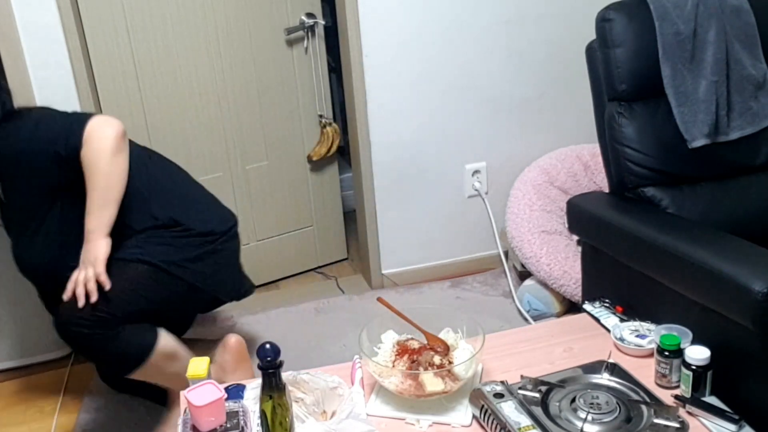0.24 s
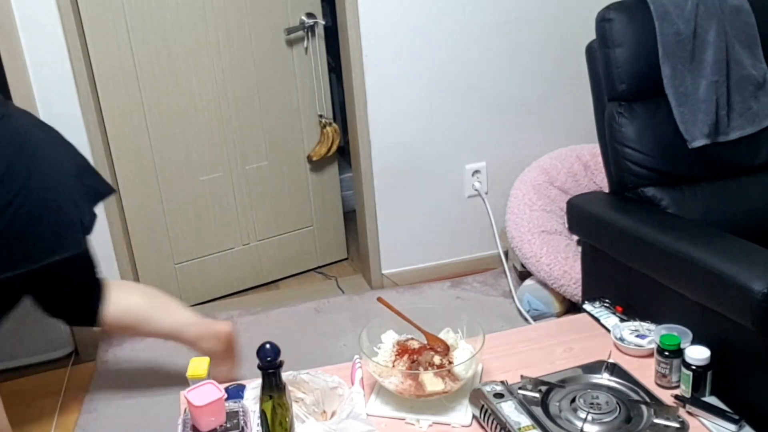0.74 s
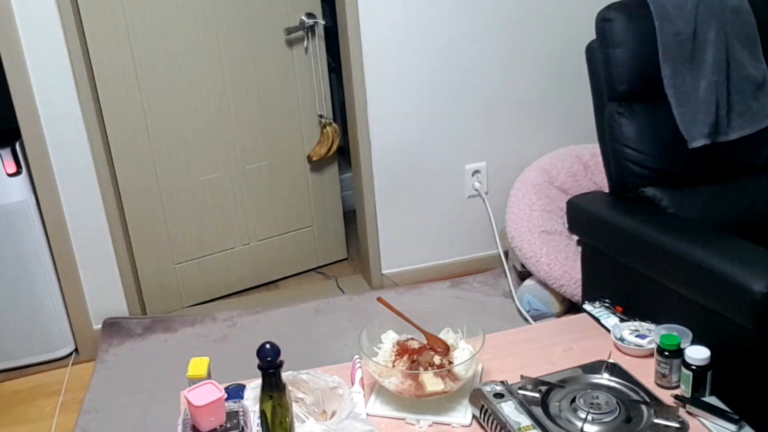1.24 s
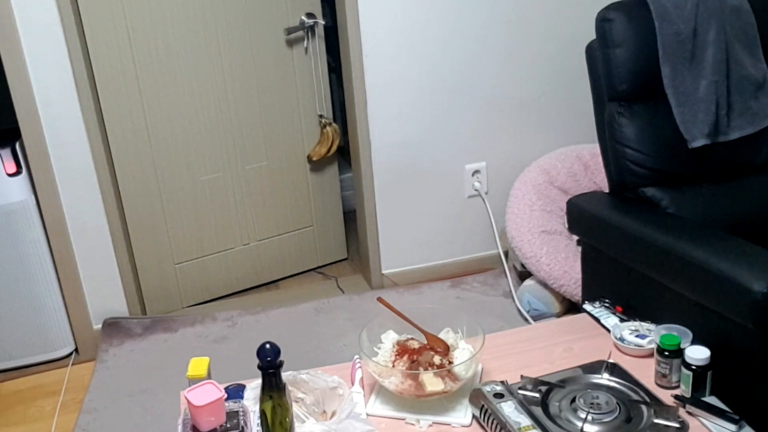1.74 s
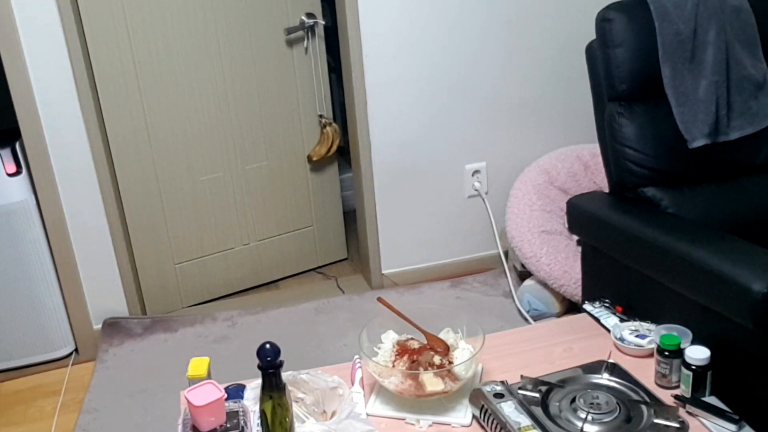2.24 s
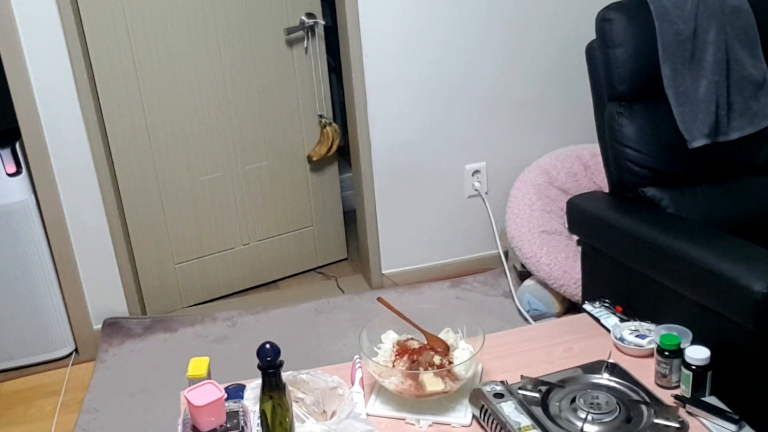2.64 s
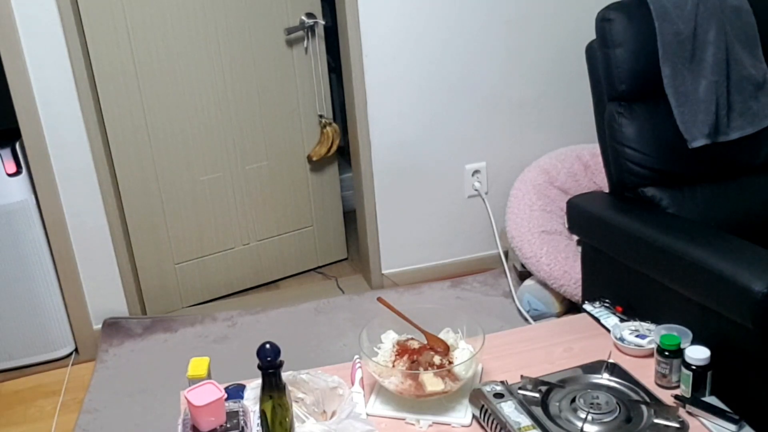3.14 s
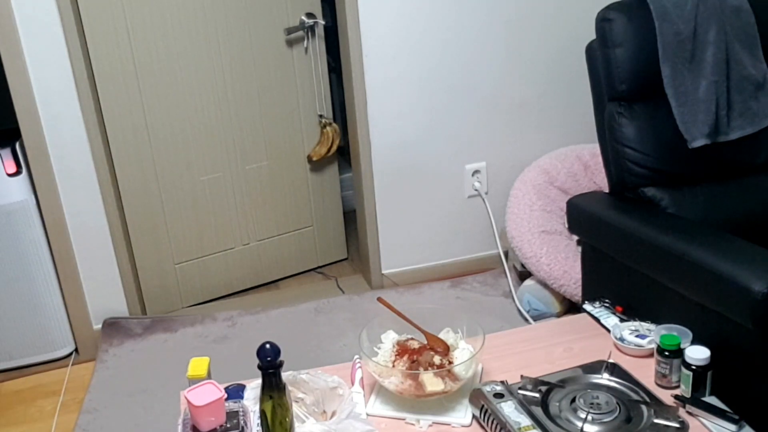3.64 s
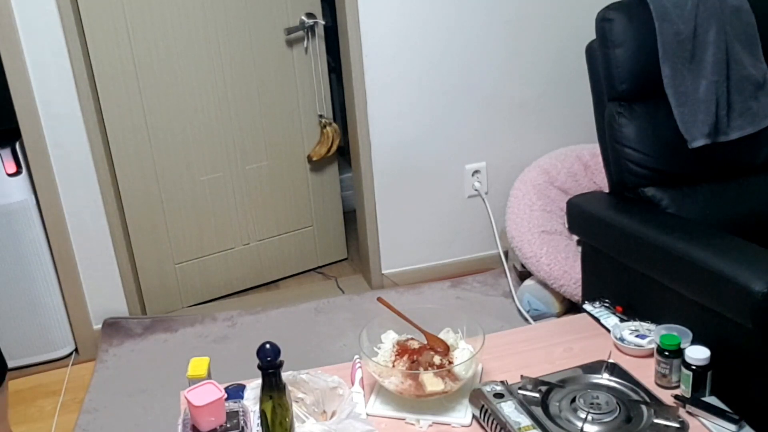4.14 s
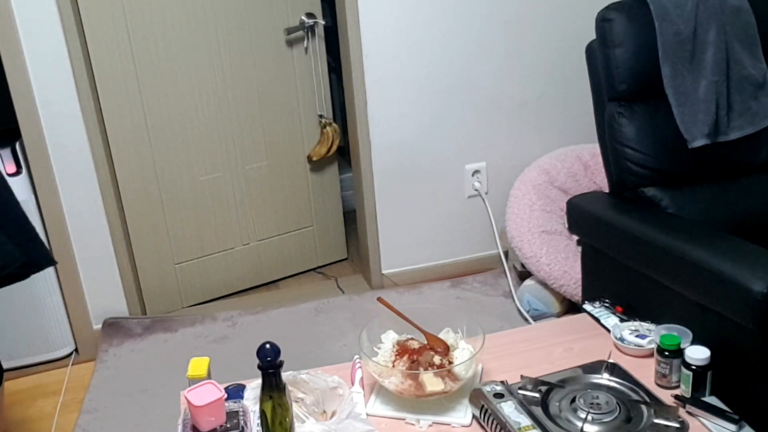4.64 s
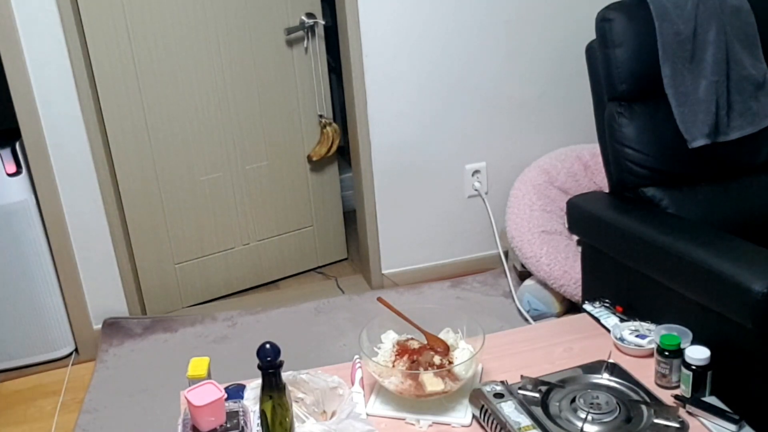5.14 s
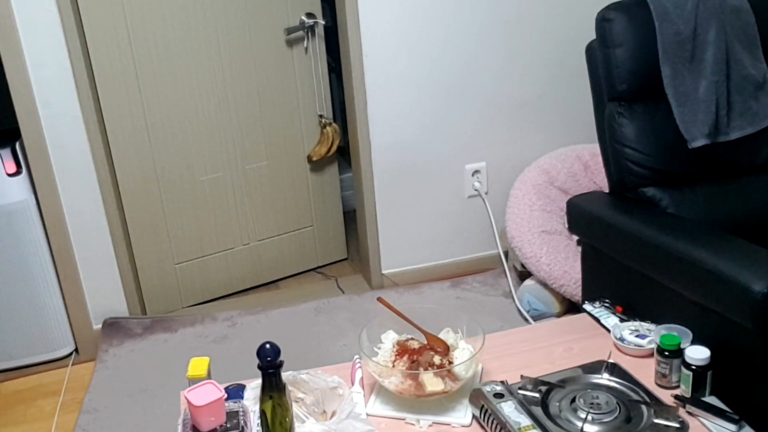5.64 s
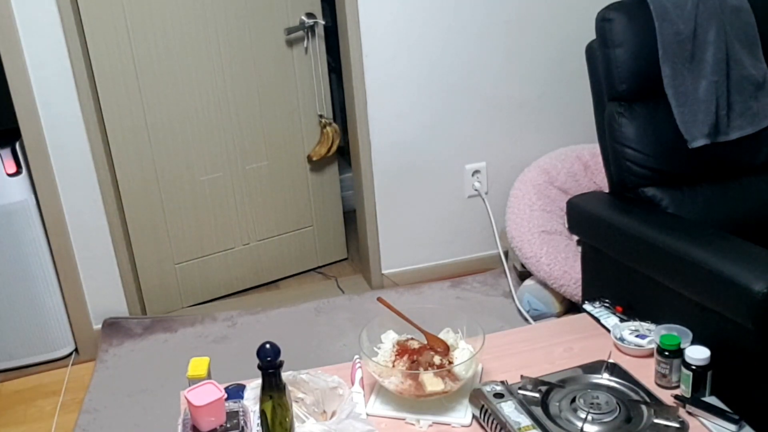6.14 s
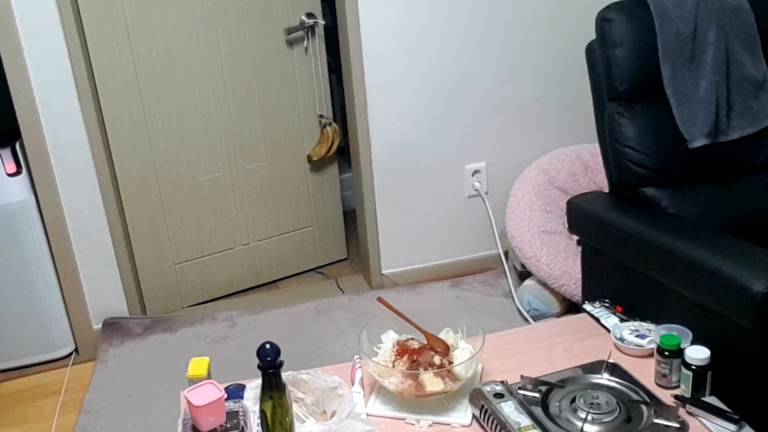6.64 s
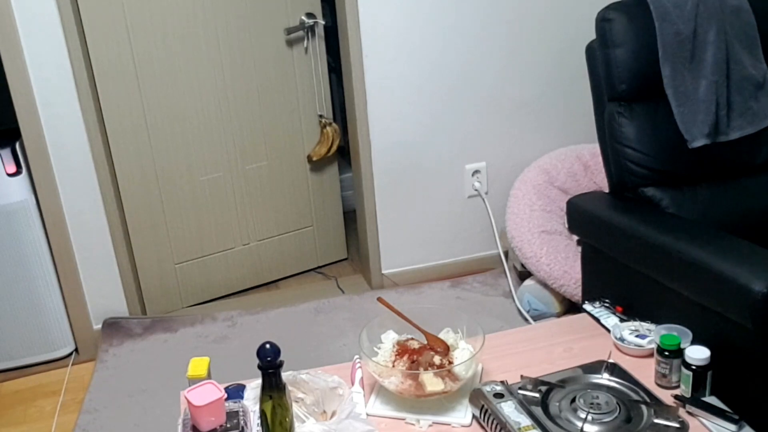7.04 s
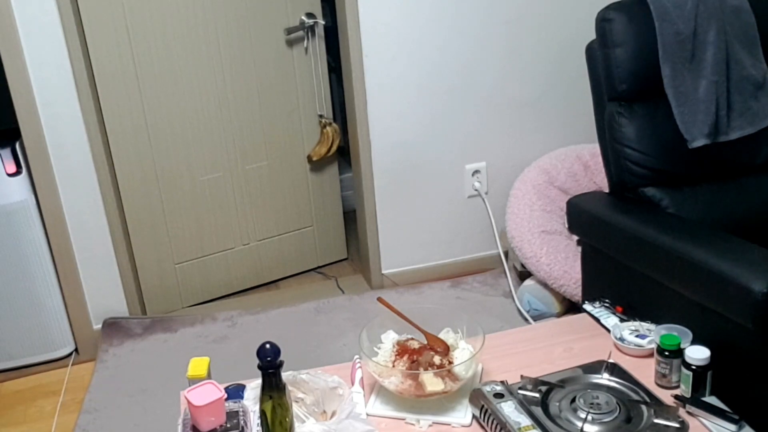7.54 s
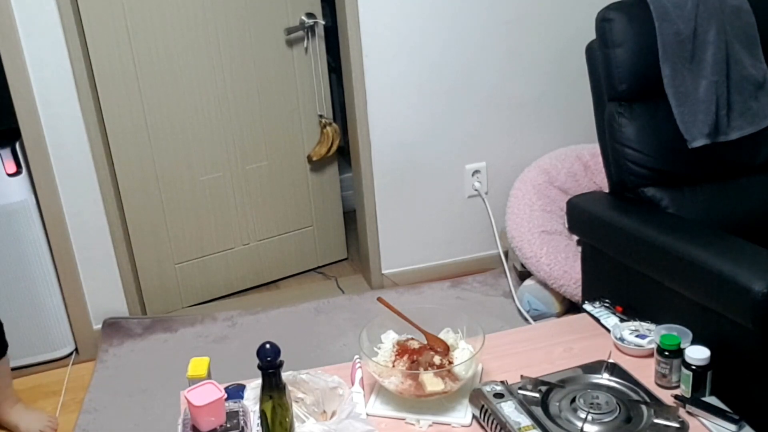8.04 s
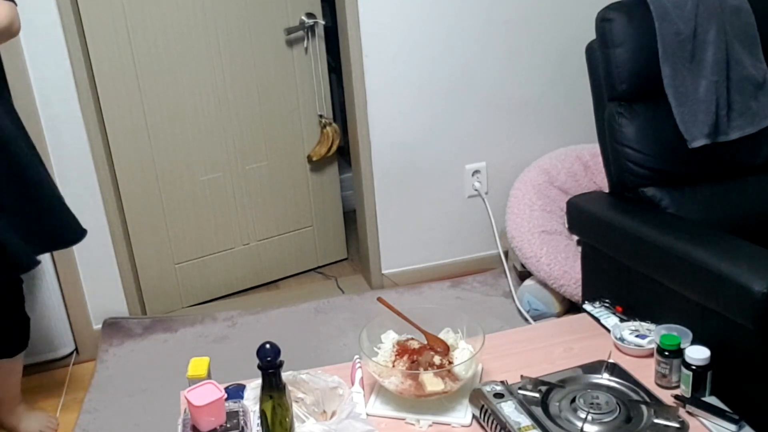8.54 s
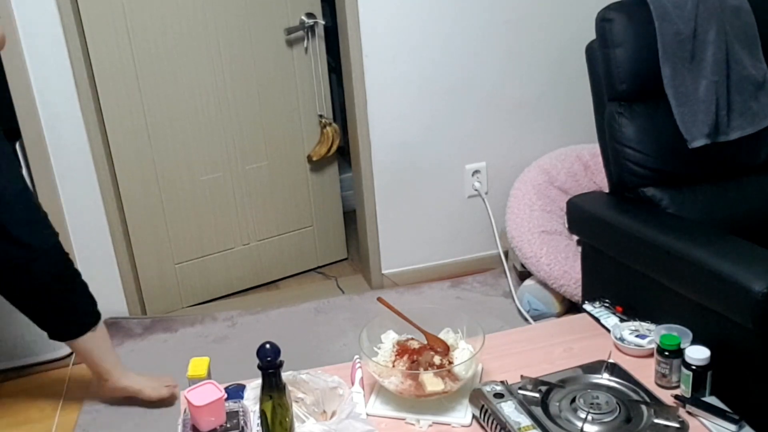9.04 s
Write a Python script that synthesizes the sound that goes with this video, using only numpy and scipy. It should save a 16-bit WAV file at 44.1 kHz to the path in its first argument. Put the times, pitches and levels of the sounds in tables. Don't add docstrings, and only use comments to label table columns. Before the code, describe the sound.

Soft rustling, a sharp click and hollow knocks over a low fridge hum, ending in a booming, cushioned door slam, jar rattle and one last tap.

```python
import sys
import numpy as np
from scipy import signal
from scipy.fft import rfft, irfft, next_fast_len
from scipy.io import wavfile
from scipy.ndimage import uniform_filter1d, map_coordinates

SR = 44100
rng = np.random.default_rng(int(sys.argv[2]) if len(sys.argv) > 2 else 0)


def persist_wave(psi):
    counts = np.round(np.clip(psi, -1, 1) * 32767).astype(np.int16)
    wavfile.write(sys.argv[1], SR, np.atleast_2d(counts).T)


def level_to_linear(level):
    exponent = np.asarray(level, float) / 20
    return 10 ** exponent


N = 409688

# (frequency [Hz], density [dB per Hz])
HUM = [(12, -85), (20, -17.5), (64, -18), (107, -7.5), (141, -9), (173, -2), (248, -12.5), (350, -19.5),
       (437, -25.5), (944, -46), (1010, -37.5), (1200, -35), (1560, -58), (2640, -120)]
# (frequency [Hz], density [dB per Hz])
HISS = [(350, -29), (600, 2), (669, -12), (767, 8.5), (941, -9), (3880, -48), (4960, -32), (15600, -16)]
# (frequency [Hz], correlation [0-1])
ALIKE = [(60, 0.92), (130, 1), (290, 0.98), (640, 0.4), (1400, 0.053), (3000, 0.047), (7000, 0.055),
         (15000, 0.071)]
# (frequency [Hz], density [dB per Hz])
CLOTH = [(300, -0.5), (700, 0.5), (1500, -1.5), (3000, -5.5), (5000, -17.5), (9000, -38)]
# (frequency [Hz], density [dB per Hz])
CRINKLE = [(1500, -7), (4000, -3), (6000, -6.5), (10000, -5.5), (14000, -8), (15600, -14)]
# (frequency [Hz], decay time t60 [s])
ROOM = [(150, 0.28), (1000, 0.17), (4000, 0.14), (12000, 0.15)]
# (time of the top [s], crinkle level [dB], cloth over crinkle [dB], half length [s])
STIRS = [(0.223, -67, 5, 1), (0.82, -77, 16, 0.18), (1.148, -63, 7.5, 0.079), (1.613, -65.5, -3, 0.15),
         (2.06, -79, 7, 0.57), (2.43, -58, 3.5, 0.22), (2.54, -60.5, 2, 0.025), (2.7, -66.5, 2, 0.71),
         (.992, -62, -5, .022), (1.892, -71, 0, .06), (3.029, -53, 4, 0.075), (3.16, -61, 5.5, 0.18),
         (3.738, -76, 7.5, 0.53), (4.195, -77, 0, 1), (4.813, -65.5, 2, 0.086), (5.03, -60, 0, 0.13),
         (5.25, -88, 4, 0.066), (5.414, -74.5, 13.5, 0.25), (6.26, -62.5, 5, 0.1), (6.696, -69, 8.5, 0.45),
         (7.176, -70, 11.5, 0.13), (7.719, -56.5, -2, 0.049), (7.993, -61, -11, 0.079),
         (8.132, -66.5, 7, 0.2), (8.578, -61.5, 0, 0.4), (8.833, -61, -8, 0.13), (9.17, -61, 3, 0.2)]
# (time [s], peak level [dB], treble [dB], decay time t60 [s])
CLICKS = [(0.494, -37, -7, 0.27), (0.868, -51, -7.5, 0.064), (0.978, -46.5, 10.5, 0.11),
          (1.327, -51, -1.5, 0.24), (2.128, -63, 12, 0.042), (2.869, -55, 4, 0.25),
          (4.019, -40.5, -8.5, 0.23), (4.075, -38.5, -2, 0.034), (4.339, -69, 9, 0.071),
          (4.831, -52.5, 4.5, 0.45), (5.032, -34, -3, 0.026), (6.159, -61, -25, .11), (6.17, -52, 6, 0.047),
          (6.264, -48.5, 1, 0.21), (6.39, -50, -30, .11), (6.563, -51, 0, 0.042), (6.643, -48, -13, 0.08),
          (6.92, -43, -17, 0.29), (7.021, -47, -11, 0.046), (7.418, -62, -15, 0.1),
          (7.7036, -29, -6.5, 0.082), (8.994, -48.5, 7.5, 0.19), (7.407, -52, -6, .04),
          (7.072, -55, -22, .07),
          (1.0905, -39, -4, 0.06),
    (1.1017, -27.5, -8, 0.052),
    (5.407, -37.5, -42, 0.14),
    (6.154, -49, -18, 0.1),
    (6.82, -66, -24, .082),
    (6.7, -54.5, 0, 0.084),
    (7.197, -30.5, -13, 0.065),
    (8.807, -37, -2.5, 0.047),
]
# (time [s], peak level [dB], treble [dB], decay time t60 [s])
RUBS = [(0.109, -53.5, -12, 0.28), (0.243, -54.5, -11, 0.38), (.572, -47, -19, 0.18),
        (0.774, -58.5, -3, 0.17), (1.604, -55.5, -6, 0.43), (1.68, -59.5, 7.5, 0.14),
        (2.069, -55.5, -1, 0.17), (2.228, -48.5, -4, 0.41), (2.289, -53.5, 2.5, 0.17),
        (2.43, -46.5, 1, 0.064), (2.499, -45.5, -1, 0.081), (3.012, -47.5, -8, 0.18),
        (3.199, -52.5, -5, 0.19), (3.768, -63.5, 10, 0.15), (3.835, -60, 0, 0.18), (4.225, -59, -11, 0.24),
        (4.957, -54, 5, 0.11), (5.112, -50.5, -2.5, 0.11), (7.749, -47.5, -11, 0.14),
        (8.189, -56, 5.5, 0.17), (8.271, -69, 14.5, 0.14), (8.378, -55, 2.5, 0.19),
        (8.417, -50.5, 4.5, 0.084), (8.528, -54, 8.5, 0.13), (8.66, -58.5, 7, 0.34),
        (8.85, -55.5, 3.5, 0.23), (9.039, -54.5, 5.5, 0.3), (9.158, -52, 6, 0.23), (6.514, -57, 1, 0.15),
        (6.9, -49, -5, 0.13)]
# (time [s], peak level [dB], frequency [Hz], decay time t60 [s])
SQUEAKS = [(.256, -59, 8950, .05), (.262, -60, 9450, .03), (.12, -55, 3300, 0.055), (.135, -53, 4180, .04),
           (.03, -55, 2600, 0.052), (3.78, -56, 3230, .03), (3.85, -52, 1800, .03), (4.024, -45, 1880, .03),
           (4.035, -45, 1250, .04), (4.085, -51, 1295, .05), (4.966, -49, 3300, .04),
           (5.07, -48, 2700, .05), (5.125, -51, 2000, .04), (5.412, -46, 1450, .04),
           (6.405, -42, 1095, .05), (7.035, -50, 2000, .02), (7.154, -36, 2020, 0.019),
           (7.27, -48, 1080, .06), (8.075, -46, 1350, .05), (8.11, -46, 1350, .05)]
# (time [s], peak level [dB], frequency [Hz], decay time t60 [s])
CRACKLES = [(.204, -48, 2800, .01), (.5053, -38.5, 2560, 0.011), (.7667, -49, 3000, 0.011),
            (.7797, -50, 2600, 0.01), (.8425, -53, 3200, 0.012), (.8824, -46, 2300, 0.01),
            (1.333, -50, 2820, .015), (2.449, -39, 805, 0.023), (2.457, -38, 1105, 0.039),
            (2.457, -47, 2160, .04), (2.483, -37.5, 626, 0.041), (2.508, -44, 1250, .02),
            (6.1727, -52, 4200, 0.0074), (6.273, -40, 517, 0.021), (6.27, -50, 2720, .015),
            (6.3, -38, 1010, 0.013), (6.4525, -61, 2540, .01), (6.4964, -58, 3000, .012),
            (6.565, -42, 1490, 0.027), (6.585, -42, 690, 0.018), (6.6426, -51, 2190, 0.027),
            (6.645, -54, 4100, .02), (6.7593, -55, 2500, .01), (6.8222, -55, 2200, 0.023),
            (6.926, -44, 2500, .012), (7.0197, -38, 2000, 0.011), (7.038, -54, 1950, .015),
            (7.0781, -55, 2400, .012), (7.0991, -52, 2790, .012), (7.206, -25, 788, 0.02),
            (7.205, -40, 1480, 0.02), (7.24, -37, 1000, 0.028), (7.256, -39, 320, .03),
            (7.262, -49, 1095, 0.039), (7.275, -43.5, 1066, .04), (7.278, -48, 600, .03),
            (7.288, -57, 2100, 0.017), (.578, -48, 1580, .02), (.597, -38, 1950, 0.014),
            (.607, -47.5, 1090, 0.027), (.612, -46, 2660, .015), (.59, -44, 620, .02),
            (.275, -46, 710, 0.025), (.98, -49, 905, .025), (1.345, -54, 1720, 0.028),
            (4.083, -45, 10000, .005), (8.817, -43, 2830, .015), (8.826, -51, 2670, .015),
            (7.029, -49, 900, .02)]
# (time [s], peak level [dB], frequency [Hz], decay time t60 [s],
# snap share [0-1])
TAPS = [(7.0735, -43, 600, 0.037, 0), (.876, -43, 1910, 0.034, 0.1), (1.098, -8.5, 1650, 0.0029, 0.27),
        (1.101, -13, 2130, 0.0046, 0.42), (1.103, -14.5, 2050, 0.0075, 0.31),
        (4.077, -40, 2640, 0.019, 0.7), (4.967, -43, 3190, 0.013, 0), (5.036, -38, 2200, 0.024, 0.3),
        (6.172, -50, 2630, 0.12, 0), (6.175, -48, 3170, 0.1, 0), (6.771, -29, 358, 0.044, 0),
        (6.885, -49, 1093, 0.08, 0.3), (7.027, -39, 700, 0.014, 0.1), (7.1975, -18, 1110, 0.023, 0.13),
        (7.199, -21, 566, 0.087, 0.07), (7.214, -14.5, 470, 0.019, 0.07), (7.707, -46, 1700, 0.013, 0.5),
        (7.711, -35, 2034, 0.039, 0.2), (8.8069, -20.5, 2650, 0.0085, 0.7), (8.8103, -17, 2110, 0.005, 0.2),
        (4.0775, -30, 12500, .003, .2), (7.201, -25.5, 346, 0.04, 0.05), (7.234, -34, 250, 0.04, 0),
             (8.0006, -17, 150, 0.032, 0.064), (8.0123, -13, 185, 0.038, 0.065),
             (8.806, -40, 2900, 0.014, 0.24), (2.463, -33.5, 595, 0.059, 0), (5.311, -35, 125.6, 0.11, 0),
             (1.0998, -17, 1080, 0.0085, 0.022), (1.103, -26, 2810, 0.0097, 0.084),
             (8.048, -33, 133, 0.18, 0.11)]
# (frequency [Hz], width [Hz], level [dB])
LID = [(1464, 320, 13), (2110, 1740, 13.5), (2830, 620, -2), (9000, 4000, -2.5)]
# (time [s], peak level [dB], body mode [Hz], upper level [dB], decay time t60 [s])
KNOCKS = [(.269, -41, 113, 0, 0.022), (2.45, -52, 166, 7, 0.085), (5.306, -27.5, 118, -35, 0.051),
          (5.329, -37, 126, -32, 0.11), (6.263, -31.5, 114, -5, 0.11), (6.292, -33.5, 181, -14, 0.061),
          (6.387, -42, 250, -3, 0.17), (6.541, -44, 176.5, -3, 0.3), (6.578, -30.5, 114, -13, 0.041),
          (6.764, -40, 298, -32, 0.042), (6.887, -48.5, 217, -10, 0.96), (6.921, -32.5, 120, -13.5, 0.13),
          (7.027, -37, 199, -5, 0.036), (7.073, -38.5, 240, -11, 0.15), (7.201, -28, 199, -10, 0.069),
          (7.206, -33.5, 114, -4, 0.16), (7.413, -28.5, 126, -19.5, 0.076), (.496, -42, 251, 1.5, 0.053),
          (5.411, -41.5, 297, -14, 0.074), (6.156, -53.5, 328, 3.5, 0.26)]
# (time [s], peak level [dB], frequency [Hz], decay time t60 [s])
SHUDDERS = [(7.893, -31, 250, .05), (7.9365, -18, 200, .04), (7.962, -24, 200, .05),
            (7.9995, -22.5, 327, .07), (8.05, -23, 310, 0.041), (8.07, -23, 219, .06),
            (8.085, -25, 72, .09), (6.27, -30, 338, .05), (6.394, -36.5, 400, 0.047),
            (6.779, -38.5, 422, 0.041), (6.925, -28, 150, 0.084), (7.085, -41, 210, .06)]
# (time [s], peak level [dB], frequency [Hz], decay time t60 [s])
JOSTLES = [(7.8885, -15, 1450, 0.013), (7.889, -22, 3260, 0.009), (7.8955, -22, 790, 0.014),
           (7.897, -25, 2600, .01), (7.898, -36, 4380, 0.01), (7.9025, -25, 1900, .012),
           (7.911, -17, 1240, .015), (7.913, -35, 2400, .01), (7.92, -38, 2770, .012),
           (7.93, -28, 1400, .015), (7.941, -28, 2000, 0.013), (7.955, -35, 1390, .015),
           (7.972, -39, 1300, .015), (7.974, -40, 2000, .01), (8.0008, -26, 680, 0.012),
           (8.001, -28, 1300, .03), (8.001, -34, 2250, .015), (8.002, -53, 5200, .025),
           (8.002, -48, 5760, .03), (8.002, -50, 6640, .02), (8.011, -27, 1050, 0.019),
           (8.01, -36.5, 1870, 0.056), (8.018, -30, 537, 0.028), (8.047, -33, 804, 0.013),
           (8.048, -30, 1380, .015), (8.055, -28, 600, 0.028), (8.056, -27, 392, 0.047),
           (8.088, -38, 400, 0.039), (8.06, -37, 1390, 0.03), (8.062, -52, 3600, 0.018)]
# (time [s], level [dB], rise time [s], clatter over the shelves [dB])
SHAKES = [
    (7.8874, -27.5, 0.0022, 3.5),
    (7.895, -24.5, 0.001, 2),
    (7.999, -34, 0.00066, -7),
    (8.013, -38, 0.003, -7.5),
    (8.056, -45.5, 0.0019, -1.5),
]
# (frequency [Hz], level over the jolt [dB], decay time t60 [s])
SHELVES = [(185, -1, 0.3), (227.3, 2.5, 0.24), (268, -25, 0.27), (310, -5, 0.15), (380, 3.5, 0.087),
           (484, 3, 0.095), (600, -7, 0.14), (724, -7, 0.055)]
# (frequency [Hz], density [dB per Hz])
CLATTER = [(200, -3), (300, -1), (600, -0.5), (1000, -6), (2000, -11), (3000, -17), (4500, -29.5),
           (7000, -38), (14000, -65)]
# (frequency [Hz], decay time t60 [s])
CLATTER_DIES = [(200, 0.18), (1000, 0.25), (3000, 0.17), (6000, 0.076), (12000, 0.15)]
# (frequency [Hz], level [dB], decay time t60 [s])
PANEL = [(31, -10, .15), (70, -1.5, .12), (85, -6, .1), (102, -10.5, .26), (131.5, -14.5, .21),
         (163, -22.5, .22)]
# (time [s], boom level [dB], push direction [+-1], cushioning [cycles])
CLOSING = [
    (7.8867, -2, 1, .94),
    (7.8973, -14, 1, .1),
    (7.9042, 5, -1, 1.2),
]
# (time [s], boom level [dB], push direction [+-1], cushioning [cycles])
BOUNCES = [
    (8.0003, -14, 1, 0.031),
    (8.0124, -15.5, 1, 0.058),
    (8.028, -15.5, 1, 0.44),
    (8.058, -18.5, -1, 0.1),
    (8.084, -21.5, 1, 0.17),
]


def unit(x):
    return x / np.sqrt(np.mean(x ** 2) + 1e-20)


def along(points, hz):
    f, v = np.transpose(points)
    return np.interp(np.log(hz + 1), np.log(f + 1), v)


def wobble(rate):
    knots = rng.standard_normal(int(N * rate / SR) + 4)
    return map_coordinates(knots, [np.arange(N) * rate / SR])


def filtered(x, response):
    m = next_fast_len(x.shape[-1] + 4096)
    spectrum = rfft(x, m) * response(np.fft.rfftfreq(m, 1 / SR))
    return irfft(spectrum, m)[..., :x.shape[-1]]


def resonance(hz, width_hz):
    return lambda f: 1j * f * width_hz / (hz * hz - f * f + 1j * f * width_hz)


def rush(spectrum, excitation):
    bounded = [(10, -120)] + list(spectrum) + [(17000, -120)]

    def mid_side(hz):
        turn = np.arccos(np.clip(along(ALIKE, hz), -1, 1)) / 2
        return level_to_linear(along(bounded, hz)) * [np.cos(turn), np.sin(turn)]

    mid, side = filtered(excitation, mid_side)
    return unit(np.array([mid + side, mid - side]))


def dying(decays, size, channels):
    hz, t, z = signal.stft(rng.standard_normal((channels, size)), SR, nperseg=256)
    z = z * level_to_linear(-60 * t / along(decays, hz)[:, None])
    return signal.istft(z, SR, nperseg=256)[1][:, :size]


def spread(count, size, alike):
    noise = rng.standard_normal((3, count, size))
    common, own = noise[0][:, None], noise[1:].transpose(1, 0, 2)
    return np.sqrt(alike) * common + np.sqrt(1 - alike) * own


def heard(sound, wet_db, walls_db=0):
    sound = np.atleast_2d(sound)
    tail = rush([(40, 0.023), (15600, 0.0094)], dying(ROOM, size=SR // 4, channels=2))
    tail = np.pad(tail / np.sqrt(SR / 4), ((0, 0), (round(0.003 * SR), 0)))
    wet = signal.fftconvolve(sound, tail, axes=1)
    sides = np.array([[1], [-1]])
    late = rng.uniform(0.001524, 0.018, (7, 1, 1))
    aside = rng.uniform(-0.000418, 0.00041, (7, 1, 1)) * sides
    place = rng.normal(-0.00002, 0.00003) * sides

    def paths(f):
        echoes = np.exp(-2j * np.pi * f * (late + aside)).sum(0)
        walls = level_to_linear(walls_db) * along([(150, 0.0025), (600, 0.2)], f) * echoes
        balance = level_to_linear(along([(100, -0.33), (400, 0.51), (2500, 1.9)], f) * sides)
        return balance * (np.exp(-2j * np.pi * f * place) + walls)

    padded = np.pad(sound, ((0, 0), (0, wet.shape[1] - sound.shape[1])))
    return filtered(padded, paths) + level_to_linear(wet_db) * wet


def add(track, s, sound):
    part = track[:, round(s * SR):][:, :sound.shape[1]]
    part += sound[:, :part.shape[1]]


def small_hits(rows, wet_db, rough_db, rise_cycles=1):
    track, t = np.zeros((2, N)), np.arange(SR // 16) / SR
    times = [row[0] for row in rows]
    first = min(times)
    source = np.zeros((1, round((max(times) - first) * SR) + len(t)))
    for s, db, hz, t60 in rows:
        chatter_db = rough_db * unit(uniform_filter1d(rng.standard_normal(len(t)), size=40))
        rise = 1 - np.exp(-t * hz / rise_cycles)
        mode = level_to_linear(db + chatter_db - 60 * t / t60) * np.sin(2 * np.pi * hz * t) * rise
        add(source, s - first, mode[None])
    add(track, first, heard(source, wet_db=wet_db, walls_db=-14))
    return track


def refrigerator_and_air():
    hum = level_to_linear(-48.5 + wobble(5.1)) * rush(HUM, rng.standard_normal((2, N)))
    return hum + level_to_linear(-71) * rush(HISS, rng.standard_normal((2, N)))


def rustle():
    top_s, crinkle_db, over_db, half_s = np.transpose(STIRS)[:, :, None]
    t = np.arange(0, N + 100, 100) / SR
    swell_db = crinkle_db - 11.5 * np.abs((t - top_s) / half_s) ** 1.44

    def total(db, rest_db):
        power = (level_to_linear(db) ** 2).sum(0) + level_to_linear(rest_db) ** 2
        return np.interp(np.arange(N) / SR, t, np.sqrt(power))

    lumps_db = 1.3 * wobble(40)
    cloth = unit(level_to_linear(lumps_db + 1.7 * wobble(150)) * rush(CLOTH, rng.standard_normal((2, N))))
    crinkle = unit(level_to_linear(lumps_db + 2.2 * wobble(300)) * rush(CRINKLE, rng.standard_normal((2, N))))
    return total(swell_db + over_db, rest_db=-69.5) * cloth + total(swell_db, rest_db=-82) * crinkle


def squeaks():
    return small_hits(SQUEAKS, wet_db=-1, rough_db=5.0, rise_cycles=9)


def crackles():
    return small_hits(CRACKLES, wet_db=-1.5, rough_db=5.0)


def clicks_and_rubs():
    track, t = np.zeros((2, N)), np.arange(SR // 3) / SR
    bursts = [(*row, 0.0027) for row in CLICKS]
    bursts += [(*row, 0.044 * row[-1]) for row in RUBS]
    for s, db, treble_db, t60, rise in bursts:
        grit = spread(count=3, size=len(t), alike=0.4)
        lower = unit(filtered(grit[0], lambda f: resonance(1250, 1700)(f) ** 3))
        upper = unit(filtered(grit[1], lambda f: resonance(2600, 2200)(f) ** 3))
        edge = unit(filtered(grit[2], lambda f: level_to_linear(along(CRINKLE, f))))
        crack = 6.9 * level_to_linear(-60 * t / 0.019)
        shape = (level_to_linear(-60 * t / t60) + crack) * (1 - np.exp(-t / rise)) ** 2
        body = lower + level_to_linear(0.23 * treble_db) * upper + level_to_linear(treble_db) * edge
        add(track, s, heard(level_to_linear(db - 8.5) * shape / shape.max() * body, wet_db=-2.0))
    return track


def taps():
    track, t = np.zeros((2, N)), np.arange(SR // 5) / SR

    def snap_response(f):
        notch = 1 - 0.67 * resonance(4900, 3000)(f)
        return resonance(2000, 6000)(f) * resonance(3500, 9000)(f) * notch

    snap = filtered(1.0 * (t == 0), snap_response)
    snap = snap / snap.max()
    for s, db, hz, t60, share in TAPS:
        ring = level_to_linear(-60 * t / t60) * np.sin(2 * np.pi * hz * t) * (1 - np.exp(-t * hz))
        add(track, s, heard(level_to_linear(db) * (ring - 1.7 * share * snap), wet_db=-9, walls_db=-10))
    return track


def lid_scrape():
    track, t = np.zeros((2, N)), np.arange(SR // 3) / SR
    rise_s, hold_s, t60 = 0.022, 0.031, 0.045
    grain_db = 2.2 * unit(uniform_filter1d(rng.standard_normal(len(t)), size=90))
    grains = level_to_linear(grain_db) * spread(count=1, size=len(t), alike=0.27)[0]
    lid = lambda f: sum(level_to_linear(db) * resonance(hz, width_hz)(f) ** 2 for hz, width_hz, db in LID)
    release = level_to_linear(-60 * np.maximum(t - rise_s - hold_s, 0) / t60)
    shape = np.minimum(t / rise_s, 1) * release
    add(track, 5.218, heard(level_to_linear(-38) * shape * unit(filtered(grains, lid)), wet_db=-2))
    return track


def knocks():
    track, t = np.zeros((2, N)), np.arange(SR // 3) / SR
    for s, db, low_hz, upper_db, t60 in KNOCKS:
        grit = rng.standard_normal((3, len(t)))
        murmur = unit(filtered(grit[0], lambda f: resonance(280, 250)(f) ** 2))
        low = np.sin(2 * np.pi * low_hz * t) + level_to_linear(0.33 * upper_db - 3.5) * murmur
        high = unit(filtered(grit[1], lambda f: resonance(555, 170)(f) ** 2))
        walls = 0.94 * unit(filtered(grit[2], lambda f: resonance(900, 1200)(f) ** 2))
        shape = level_to_linear(-60 * t / t60) * (1 - np.exp(-t / 0.0015))
        builds = 1 - np.exp(-t / 0.006)
        body = low + level_to_linear(upper_db - 3.5) * builds * (high + walls)
        add(track, s, heard(level_to_linear(db + 1.0) * shape * body, wet_db=-4.0))
    return track


def cabinet_shudders():
    return small_hits(SHUDDERS, wet_db=-12, rough_db=0.2, rise_cycles=0.67)


def jostled_jars():
    return small_hits(JOSTLES, wet_db=-8.0, rough_db=2.5)


def door_shelves():
    track, t = np.zeros((2, N)), np.arange(SR * 3 // 4) / SR
    hz, level_db, t60 = np.transpose(SHELVES)[:, :, None]
    for s, db, rise, clatter_db in SHAKES:
        scatter_db, phase = rng.normal(0, 2.43, (2, len(SHELVES), 1))
        modes = level_to_linear(level_db + scatter_db - 60 * t / t60) * np.sin(2 * np.pi * hz * t + phase)
        rattle = [[1, 0.35], [1, -0.51]] @ dying(CLATTER_DIES, size=len(t), channels=2)
        lumps_db = 3.5 * unit(uniform_filter1d(rng.standard_normal(len(t)), size=200))
        clatter = filtered(rattle * level_to_linear(lumps_db), lambda f: level_to_linear(along(CLATTER, f)) * (f > 200))
        clatter = level_to_linear(clatter_db) * clatter / np.std(clatter[:, :SR // 50])
        jolt = level_to_linear(db) * (modes.sum(0) + clatter) * (1 - np.exp(-t / rise))
        add(track, s, heard(jolt, wet_db=-12.0))
    return track


def door():
    track, t = np.zeros((2, N)), np.arange(SR // 2) / SR
    hz, level_db, t60 = np.transpose(PANEL)[:, :, None]
    for s, boom_db, push, cushion in CLOSING + BOUNCES:
        swell = 1 - np.exp(-t * hz / cushion)
        modes = level_to_linear(level_db - 60 * t / t60) * np.cos(2 * np.pi * hz * t) * swell
        add(track, s, heard(level_to_linear(boom_db) * push * modes.sum(0), wet_db=-9.0))
    return track


def scene():
    background = refrigerator_and_air() + rustle()
    handling = squeaks() + crackles() + clicks_and_rubs() + taps() + lid_scrape() + knocks()
    shutting = cabinet_shudders() + jostled_jars() + door_shelves() + door()
    return background + handling + shutting


def low_pass(x):
    return signal.sosfilt(signal.butter(12, 16530, fs=SR, output="sos"), x)


def record(dry):
    lag_s = np.array([[0.00018], [0]])
    ports = filtered(dry, lambda f: (f < 15560) * np.exp(-2j * np.pi * f * lag_s))
    return low_pass(ports)


dry = scene()
out = record(dry)
persist_wave(out)
```